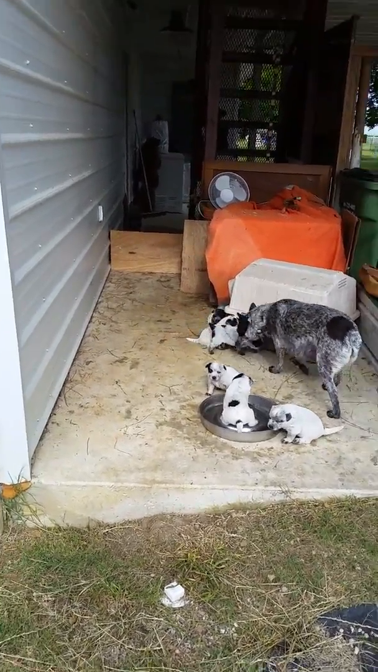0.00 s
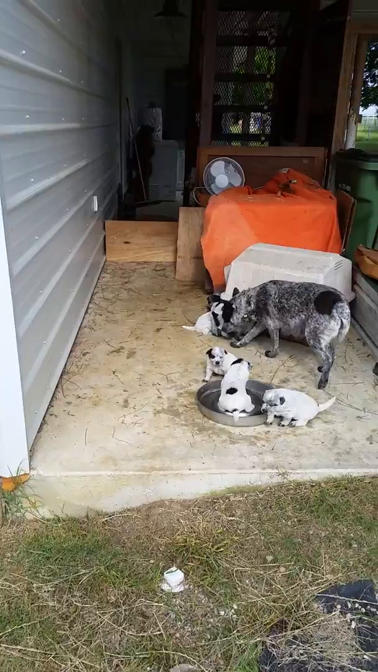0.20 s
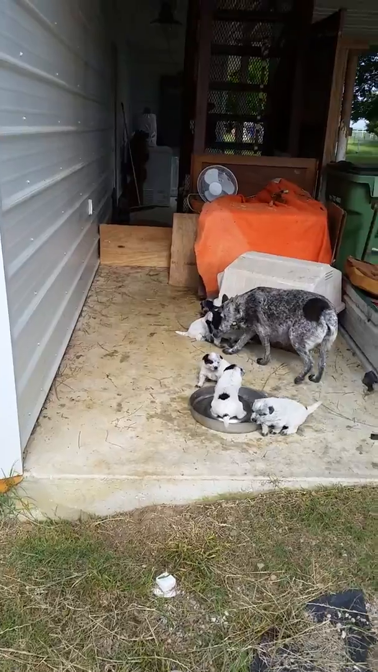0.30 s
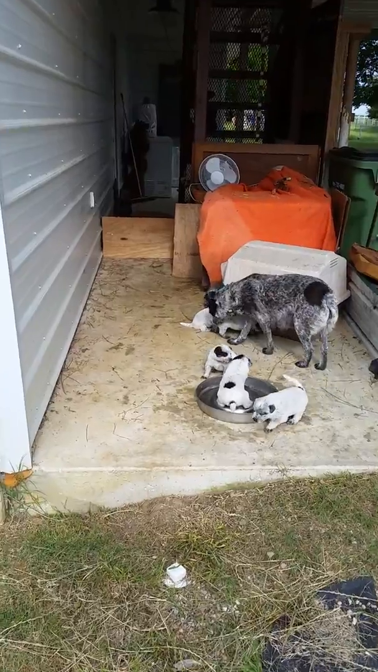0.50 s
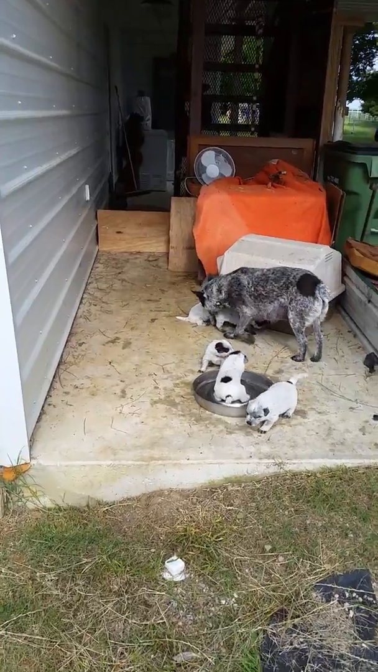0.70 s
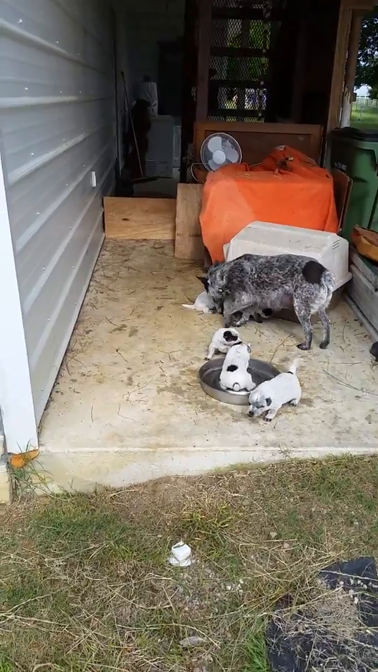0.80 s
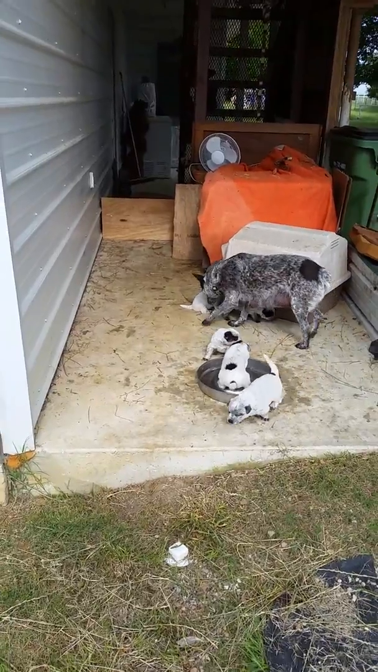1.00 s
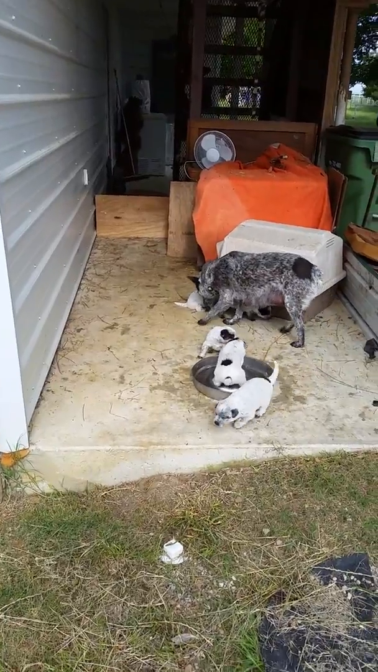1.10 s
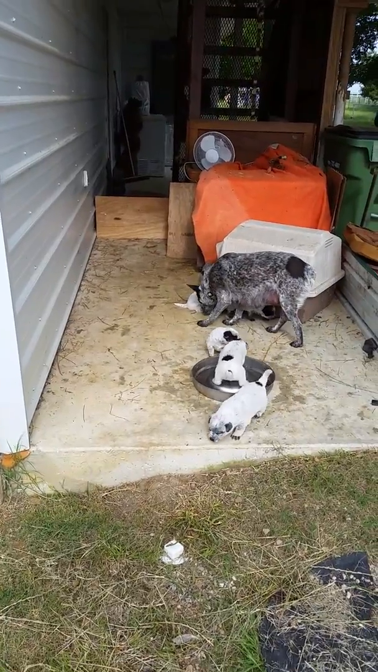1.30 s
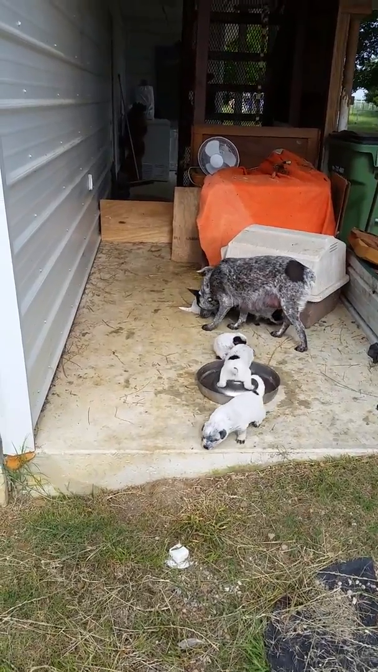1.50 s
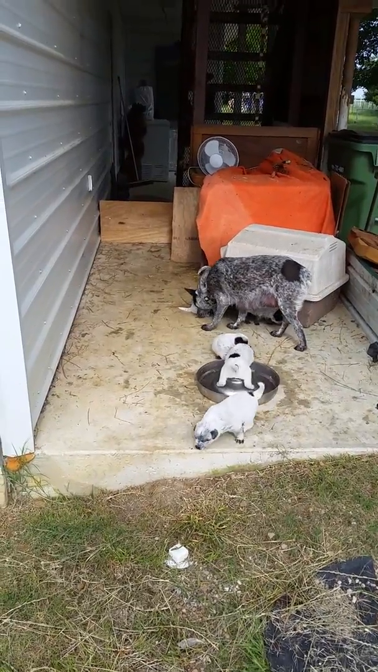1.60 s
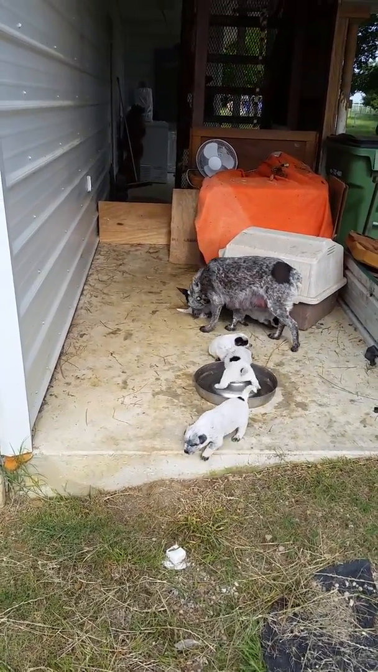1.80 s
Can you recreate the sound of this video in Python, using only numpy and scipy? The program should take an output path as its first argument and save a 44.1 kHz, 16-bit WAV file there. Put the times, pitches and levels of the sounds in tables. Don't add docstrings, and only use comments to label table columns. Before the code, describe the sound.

Skin sticks and slips on a phone case, very close to the microphone, knocking and rattling for under a second; afterwards quiet air hiss, distant puppy yelps and a barely audible rising bird whistle.

```python
import sys
import numpy as np
from scipy import signal
from scipy.fft import rfft, irfft
from scipy.io import wavfile

SR = 44100
rng = np.random.default_rng(int(sys.argv[2]) if len(sys.argv) > 2 else 0)


def field_ratio(decibels):
    return 10 ** (np.asarray(decibels, dtype=float) / 20)


def file_out(sig):
    cols = np.atleast_2d(sig).T
    lim = np.clip(cols, -1, 1)
    pcm = np.round(lim * 32767).astype(np.int16)
    wavfile.write(sys.argv[1], SR, pcm)


N = 79380
T = np.arange(N) / SR
F = np.maximum(np.arange(N // 2 + 1) * SR / N, 1)

# (time [s], level [dB], contact [ms])
SLIPS = [(.1194, -31, 1.6), (.201, -19.5, 1.3), (.2263, -25, 1.5), (.3221, -17, 1.3), (.3348, -19, 1.2),
         (.4767, -23.6, 1.4), (.5728, -14.6, 1.2), (.5955, -12, 1.1), (.6164, -14.5, 1.2),
         (.6553, -10.4, .9), (.6658, -13, 1.2), (.7439, -13.6, 1.1), (.7643, -11, 1.1), (.7747, -9.5, 1.3),
         (1.0241, -40.4, 2.5)]
# (time [s], level [dB], contact [ms])
CATCHES = [
    (.6413, -15, 2.8),
    (.6841, -9.7, 1.2),
    (.7227, -13.3, 1.4),
    (.7279, -13, 1.6),
    (.7593, -11, 1.4),
    (.791, -8.5, 1.1),
    (1.1955, -46.4, 2.5),
    (1.6708, -46.8, 4.3),
    (1.7454, -47.7, 3.2),
]
# (time [s], pressure [dB], judder rate [Hz])
RUB = [(.44, -63.5, 400), (.52, -51.5, 455.7), (.56, -52, 388.1), (.61, -37.5, 330), (.657, -28.5, 552),
       (.7, -39, 224.2), (.735, -27.5, 272.7), (.765, -26, 450.5), (.795, -27, 504), (.81, -37, 424),
       (.89, -44.5, 594), (.93, -64, 584), (1.15, -132.5, 612.6)]
# (frequency [Hz], width [Hz], level [dB])
CASE_MODES = [
    (112.6, 72, 1),
    (330, 58, -5.5),
    (593, 136, 5),
]
# (frequency [Hz], width [Hz], level [dB])
PANEL_MODES = [(725, 170, -11), (901, 125, -5), (1126, 146, -9.5), (1400, 236, -17.5), (1734, 480, -21),
               (1830, 92, -29.5), (2800, 570, -33), (4200, 970, -39.5)]
# (time [s], level [dB], left minus right [dB], centre [Hz])
TICKS = [
    (.448, -64, 14, 13000),
    (.521, -68, 8, 6000),
    (.597, -53, -3, 13500),
    (.62, -60, -6, 13500),
    (1.175, -70, 8, 5500),
]
# (time [s], length [s], start [Hz], end [Hz], level [dB])
WHIMPERS = [
    (.38, .02, 1850, 1800, -66),
    (1.012, .036, 810, 1290, -65),
    (1.086, .034, 1130, 1090, -66),
    (1.345, .026, 990, 980, -71),
    (1.558, .034, 1000, 980, -71),
    (1.385, .05, 245, 235, -68),
]
# (time [s], resonance [Hz], level [dB])
SNIFF = [
    (.245, 4576, -86.5),
    (.256, 4370, -73.5),
    (.285, 3895, -65),
    (.308, 3727, -62),
    (.345, 3313, -62.5),
    (.372, 2800, -68.5),
    (.385, 2830, -83.5),
    (.45, 3380, -77),
]
# (time [s], centre [Hz], level [dB])
SQUEAL = [
    (.28, 12400, -98),
    (.306, 13890, -84),
    (.322, 14240, -79),
    (.356, 14255, -68),
    (.386, 14100, -71),
    (.4, 14100, -80),
    (.46, 14100, -92),
]
# (time [s], frequency [Hz], level [dB])
WHISTLE = [
    (1.62, 2050, -101),
    (1.68, 2350, -93),
    (1.73, 2650, -88),
    (1.78, 2900, -80),
    (1.8, 2980, -80),
]
# (time [s], level [dB])
OPENING = [(0, 9), (.1, 7), (.22, 3.5), (.3, 11.5), (.57, 8.5), (.66, 7.5), (.71, 14.5), (.76, 16.5),
           (.97, 13), (1.1, 6.5), (1.2, 6.5), (1.25, 4.5), (1.5, -0.5), (1.8, 2)]
# (frequency [Hz], level [dB per Hz])
AIR_LEFT = [(30, -87), (80, -78.5), (240, -92), (400, -98.5), (1100, -107), (3300, -118), (7000, -121),
            (16000, -120)]
# (frequency [Hz], level [dB per Hz])
AIR_RIGHT = [(30, -73.5), (80, -76.5), (250, -91), (520, -105), (1500, -115), (3500, -127), (8000, -131),
             (16000, -128)]
# (frequency [Hz], width [octaves], left [dB], right [dB])
PORTS = [
    (1370, 0.15, 7.5, -0.5),
    (4890, 0.25, 12.5, -1.5),
    (6580, 0.14, 14, -7.5),
    (8130, 0.12, -9, -24.5),
    (10030, 0.21, -18.5, -10.5),
]


def rms_one(x):
    return x / np.sqrt(np.mean(x ** 2) + 1e-20)


def in_time(rows):
    s, *columns = np.transpose(rows)
    return [np.interp(T, s, column) for column in columns]


def during(rows):
    return (T > rows[0][0]) * (T < rows[-1][0])


def panned(x, pan_db):
    return x * field_ratio(np.array([[pan_db / 2], [-pan_db / 2]]))


def drift(rate_hz):
    r = np.exp(-2 * np.pi * rate_hz / SR)
    noise = rng.standard_normal(N + SR)
    return rms_one(signal.lfilter([1], [1, -2 * r, r * r], noise)[SR:])


def resonate(x, hz, width_hz):
    r = np.exp(-np.pi * width_hz / SR)
    b = [(1 - r * r) / 2, 0, (r * r - 1) / 2]
    a = [1, -2 * r * np.cos(2 * np.pi * hz / SR), r * r]
    return signal.lfilter(b, a, x + 1e-18)


def narrow_noise(hz, width_hz):
    sos = signal.butter(2, width_hz / 2, fs=SR, output="sos")
    a, b = signal.sosfilt(sos, rng.standard_normal((2, N)))
    phase = 2 * np.pi * np.cumsum(hz) / SR
    return rms_one(a * np.cos(phase) + b * np.sin(phase))


def swing(t, ms):
    u = t / (ms / 2000)
    return -u * np.exp(.5 - u * u / 2)


def swings(events, contact_ms=None):
    return sum(field_ratio(db) * swing(T - s, contact_ms or ms) for s, db, ms in events)


def grains(ms, count):
    rate_hz, spread_db = 420 / ms, 6
    size = field_ratio(spread_db * np.minimum(rng.exponential(1, (count, N)), 4.0))
    size = size * rng.choice([-1, 1], (count, N))
    born = rng.random((count, N)) < rate_hz / SR
    shape = swing(np.arange(-200, 201)[None] / SR, ms)
    return rms_one(signal.fftconvolve(size * born, shape, "same", axes=1))


def judder(hz):
    turns = np.cumsum(hz * (1 + .09 * drift(25))) / SR
    releases = np.diff(np.floor(turns), prepend=0) * field_ratio(5.0 * drift(130))
    return rms_one(signal.fftconvolve(releases, swing(np.arange(-200, 201) / SR, 1.0), "same"))


def case(force):
    near = field_ratio(.86) * force + sum(field_ratio(db) * resonate(force, hz, w) for hz, w, db in CASE_MODES)
    far_db, far_bass_db, bass_hz, lag_s = -4, -10, 199, .000826
    loss = field_ratio(far_db + far_bass_db / (1 + (F / bass_hz) ** 6))
    path = loss * np.exp(-2j * np.pi * F * lag_s)
    ring = field_ratio(-3) * resonate(force, 233.3, 80)
    return np.array([irfft(rfft(near + ring) * path, N), near])


def panel(rub):
    fine_ms, alike = .27, .8
    both, apart = grains(fine_ms, count=2) * rub
    short = [event for event in SLIPS + CATCHES if event[2] < 2]
    jolt = field_ratio(-11) * swings(short, fine_ms)
    drive = np.sqrt(1 + alike) * both + jolt + np.sqrt(1 - alike) * apart * [[1], [-1]]
    drive = drive + field_ratio(9) * rub * rng.standard_normal((2, N))
    buzz = 0
    for k, (hz, width_hz, db) in enumerate(PANEL_MODES):
        buzz = buzz + field_ratio(db + 3.5) * (-1) ** k * resonate(drive, hz, width_hz)
    return panned(buzz, 1.5)


def hand():
    pressure_db, rate_hz = in_time(RUB)
    rub = field_ratio(pressure_db) * during(RUB)
    slips = swings(SLIPS) - swings(CATCHES)
    friction = field_ratio(-.5) * grains(1, count=1)[0] + judder(rate_hz)
    return case(field_ratio(-2.5) * slips + rub * friction) + panel(rub)


def ticks():
    out = 0
    for s, db, pan_db, hz in TICKS:
        burst = np.exp(-((T - s) / .0008) ** 2) * narrow_noise(np.full(N, hz), hz / 2)
        out = out + panned(field_ratio(db) * burst, pan_db)
    return out


def puppies():
    out, waver = 0, 1 + .02 * drift(45)
    edge_s, overtone_db, echo_s, echo_db = .006, -22, .011, -9
    for s, length, start_hz, end_hz, db in WHIMPERS:
        hz = np.interp(T, [s, s + length], [start_hz, end_hz]) * waver
        phase = 2 * np.pi * np.cumsum(hz) / SR
        shape = np.clip(np.minimum(T - s, s + length - T) / edge_s, 0, 1)
        out = out + field_ratio(db + 4) * shape * (np.sin(phase) + field_ratio(overtone_db) * np.sin(2 * phase))
    echo = field_ratio(echo_db) * np.interp(T - echo_s, T, out)
    return panned(out, 3.4) + panned(echo, 5.5)


def dog():
    hz, db = in_time(SNIFF)
    jet = narrow_noise(hz, 680)
    hiss = field_ratio(-15) * (hz / 3900) ** 4 * narrow_noise(hz * 1.35, 2130)
    squeal_hz, squeal_db = in_time(SQUEAL)
    squeal = during(SQUEAL) * field_ratio(squeal_db) * narrow_noise(squeal_hz, 190)
    sniff = during(SNIFF) * field_ratio(db + .83 * drift(64)) * (jet + hiss)
    return panned(sniff, 17) + panned(squeal, 32)


def bird():
    hz, db = in_time(WHISTLE)
    tone = np.sin(2 * np.pi * np.cumsum(hz) / SR) + 1.4 * narrow_noise(hz, 120)
    return panned(field_ratio(db) * tone * (T > WHISTLE[0][0]), 11.5)


def air():
    db = []
    for table in (AIR_LEFT, AIR_RIGHT):
        hz, density_db = np.transpose(table)
        db.append(np.interp(np.log(F), np.log(hz), density_db))
    spectrum = rfft(rng.standard_normal((2, N))) * field_ratio(np.array(db)) * np.sqrt(SR / 2)
    low = 1 / (1 + (F / 450) ** 4)
    opening_db = in_time(OPENING)[0]
    gusts_db = 2.5 * np.array([drift(4.7), drift(14)])
    rumble = irfft(spectrum * low, N) * field_ratio(.35 * opening_db + gusts_db)
    hiss = irfft(spectrum * (1 - low), N) * field_ratio(opening_db + .6 * drift(10))
    return rumble + hiss


def scene():
    return hand() + ticks() + puppies() + dog() + bird() + air()


def band_limit(x):
    return signal.sosfilt(signal.butter(12, 16370, fs=SR, output="sos"), x)


def record(dry):
    db = np.zeros((2, len(F)))
    for hz, octaves, left_db, right_db in PORTS:
        db += np.exp(-(np.log2(F / hz) / octaves) ** 2) * np.array([[left_db], [right_db]])
    low_cut_hz, top_hz, ceiling = 30, 15830, .62
    gain = field_ratio(db) / (1 + (low_cut_hz / F) ** 4) * (F < top_hz)
    mix = ceiling * np.tanh(irfft(rfft(dry) * gain, N) / ceiling)
    return band_limit(mix)


dry = scene()
out = record(dry)
file_out(out)
```